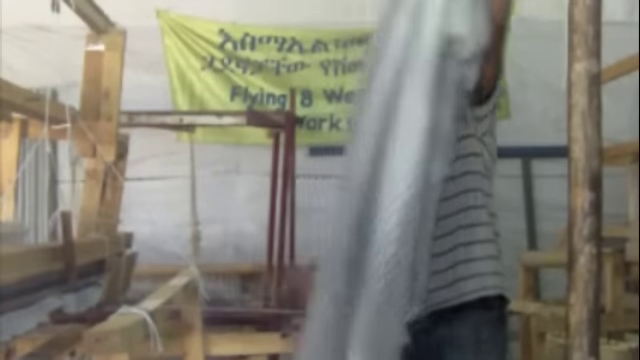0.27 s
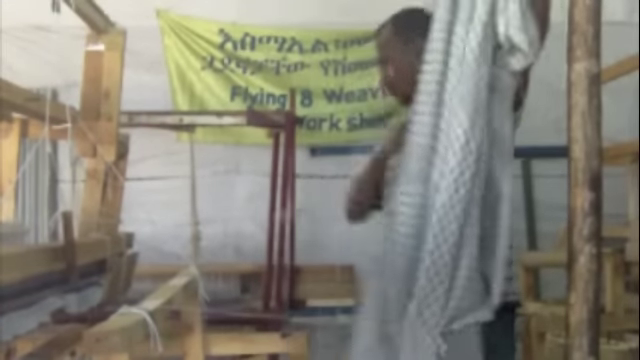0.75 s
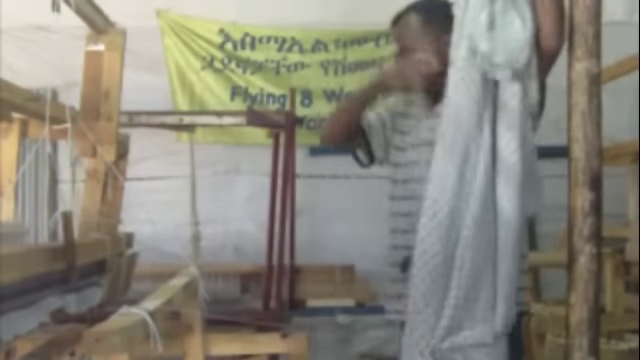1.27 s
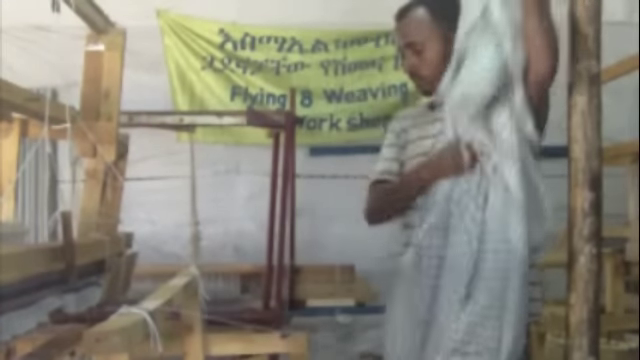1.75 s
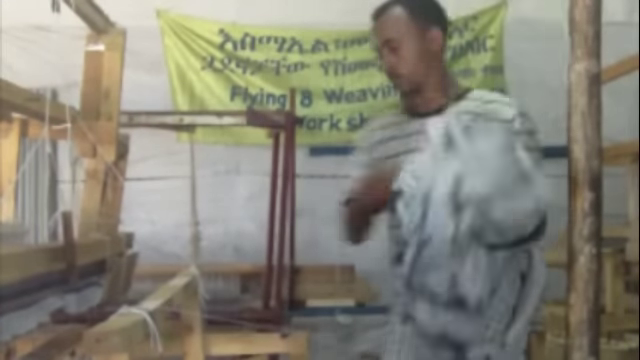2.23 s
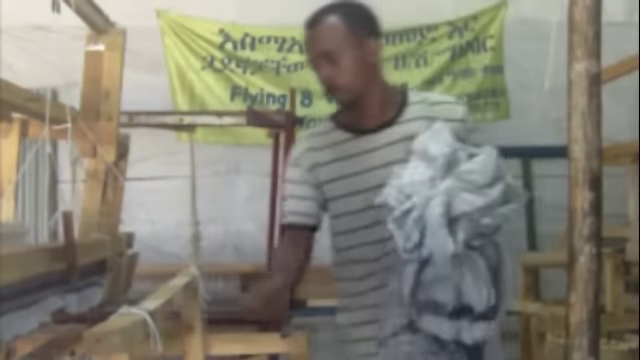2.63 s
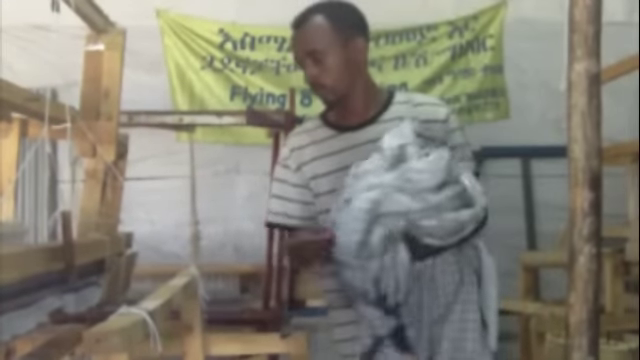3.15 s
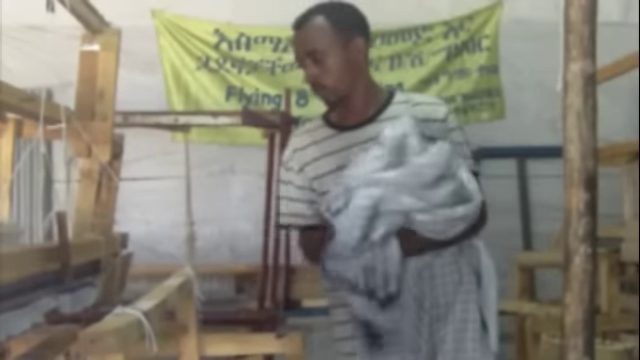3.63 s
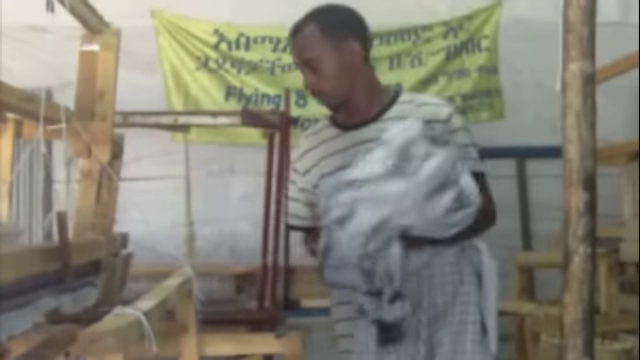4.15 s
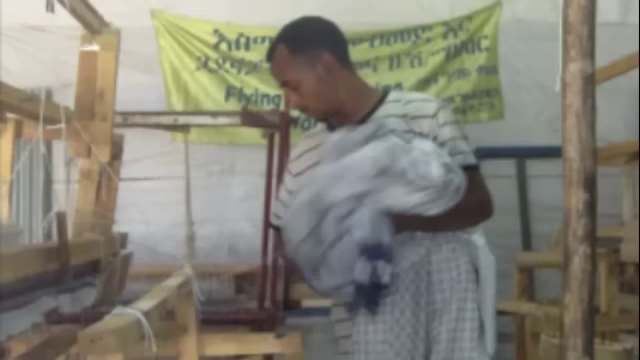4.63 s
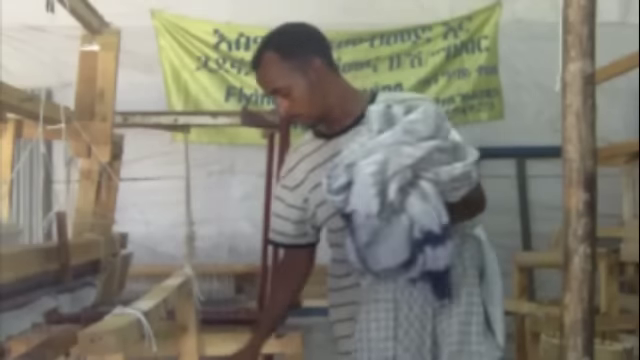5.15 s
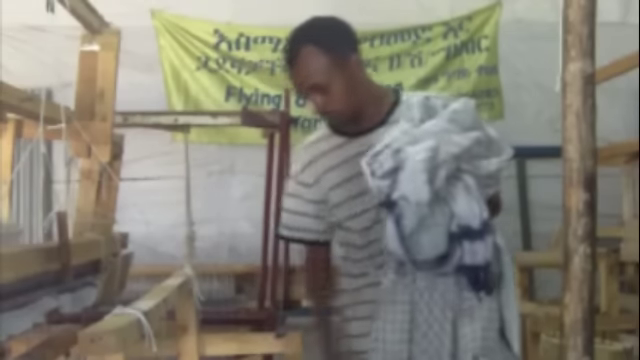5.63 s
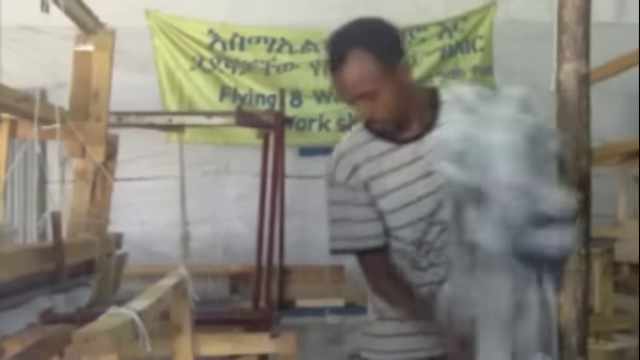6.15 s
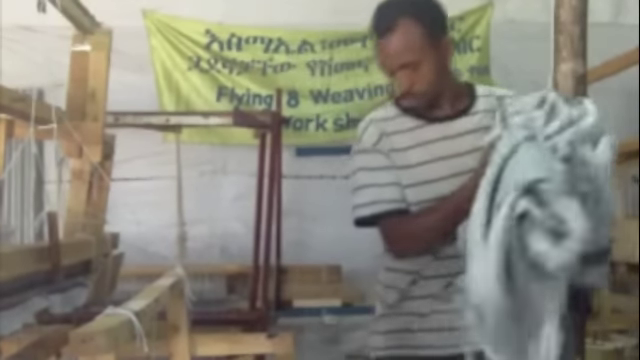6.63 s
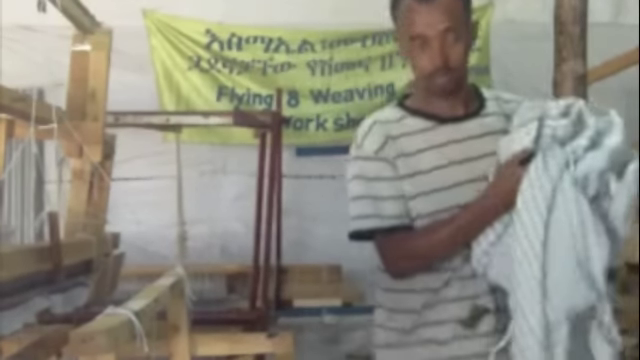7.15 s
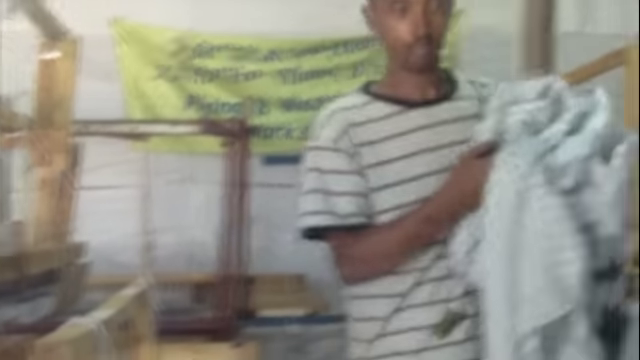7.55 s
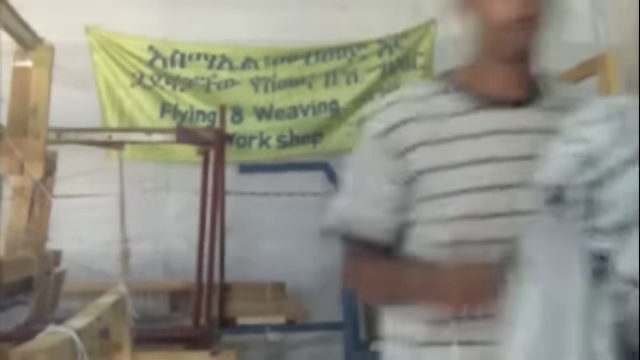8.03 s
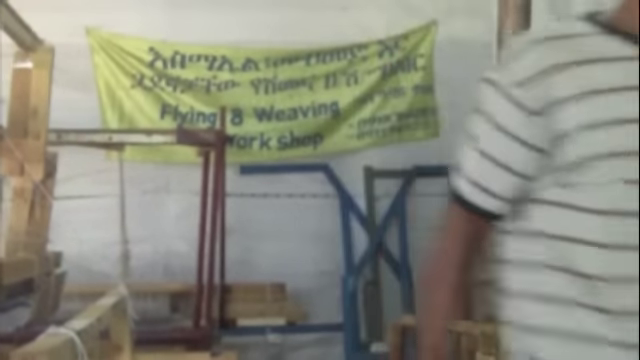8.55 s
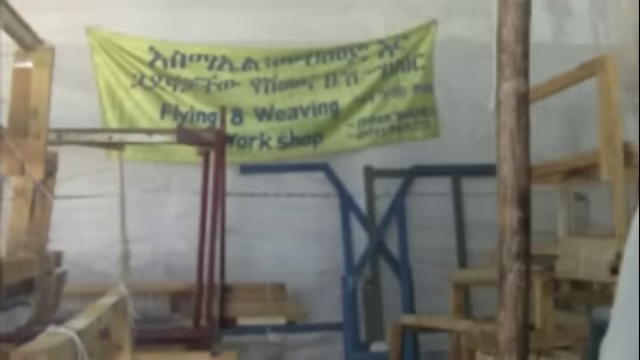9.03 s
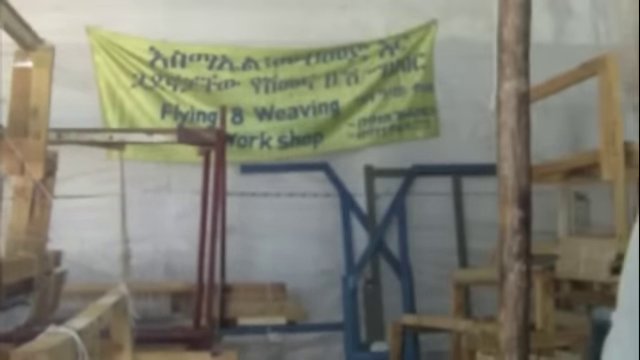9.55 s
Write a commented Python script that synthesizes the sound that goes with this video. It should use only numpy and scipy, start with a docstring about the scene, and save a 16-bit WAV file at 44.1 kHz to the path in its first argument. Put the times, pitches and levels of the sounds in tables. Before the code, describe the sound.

A handloom works steadily and close in a small workshop. About every 0.9 seconds a cord tugs, the shuttle rattles and rings along its wooden track with hard knocks and a rising squeak, judders into a hollow box, then the metal reed crashes and jingles. Dry clacks and treadle thuds fall between some passes. Sound is bright, light in bass, with short diffuse echoes and stereo treble leaning slightly right.

```python
"""A shuttle flies and rattles along its wooden track, rumbles into a box, and a metal reed crashes and jingles.
This is a handloom in a small workshop, worked steadily at about one pass ("pick") every 0.9 s, with clacks
and thuds as the treadles change over. Showers of tiny random impacts are the raw sound of each part: movements
and blows set their strength, and filters make wood, wire and box ring. Soft echoes and faint air lie behind.
"""
import sys
import numpy as np
from scipy import signal
from scipy.fft import rfft, irfft
from scipy.io import wavfile
from scipy.ndimage import uniform_filter1d

SR = 44100
rng = np.random.default_rng(int(sys.argv[2]) if len(sys.argv) > 2 else 0)


def bounce(signal):
    """Save signal as a 16-bit WAV file at the path given by the first command-line argument."""
    frames = np.transpose(np.atleast_2d(signal))
    limited = np.clip(frames, -1, 1)
    pcm = np.round(limited * 32767).astype(np.int16)
    wavfile.write(sys.argv[1], SR, pcm)


N = 431298

# In tables of blows, modes and spectra, levels are relative: each layer adds its own level later.
# the weaver's rhythm, one row a pick: cord_pulled_s, shuttle_thrown_s, shuttle_caught_s, reed_beats_s
PICKS = [(-.08, .057, .357, .475), (.82, .959, 1.243, 1.329), (1.78, 1.897, 2.187, 2.317),
         (2.675, 2.797, 3.093, 3.178), (3.63, 3.751, 4.038, 4.16), (4.53, 4.638, 4.932, 5.023),
         (5.45, 5.563, 5.842, 5.975), (6.33, 6.451, 6.752, 6.833), (7.27, 7.38, 7.666, 7.79),
         (8.13, 8.263, 8.566, 8.635), (9.075, 9.202, 9.492, 9.611)]
# how hard each pick is worked: throw_db, shuttle_ring_db, catch_db, beat_db, jingle_t60_s
EFFORT = [(-1, 0.5, 0.5, -0.5, 0.54), (-2, 3, 1, -0.5, 0.95), (-3, 0.5, 1, .5, 0.61),
          (-0.5, 0.5, -1, 0.5, 0.67), (4, -1, 0, 0, 1), (0.5, -0.5, 0.5, 0.5, 0.67), (0, 3.5, 0.5, 0, 1.0),
          (-0.5, -1, -1.5, 0, 0.76), (0.5, 1, 0.5, 0, 0.92), (-0.5, -1, -1, 0, 0.51),
          (-2, 1, -0.5, 0.5, .6)]
# hardest knocks of the shuttle on its track (the race): time_s, level_db
KNOCKS = [(.1446, -2.5), (0.9248, -1.5), (1.0232, -1), (1.144, -4.5), (1.9809, -1.5), (2.7418, -2.5),
          (2.8374, 0), (2.9745, -4), (3.836, -1.5), (4.5852, -1.5), (4.674, -2), (4.83, -3.5),
          (5.637, -7.5), (6.4108, -3), (6.4936, -2), (6.618, -4), (7.5677, -5), (8.2206, -2), (8.2945, -5),
          (9.2833, -1.5), (9.3492, -3)]
# hard dry clacks of the gear that parts the threads: time_s, level_db
CLACKS = [(1.6017, -0.5), (1.844, -7.5), (3.4477, -3), (3.474, -6.5), (3.693, -8.5), (5.272, -3.5),
          (7.1006, -1.5), (8.9114, -2), (9.1067, -9)]
# a treadle thuds down after every second pick: time_s, level_db
TREADLES = [(.677, -18), (2.531, -25.5), (4.358, -23), (6.183, -26), (7.985, -23.5)]
# the heddles (wires that lift the threads) are jolted as the shed changes: time_s, level_db
JOLTS = [(.6594, -21), (3.3044, -10), (3.544, -11.5), (3.6506, -9), (4.3444, -16), (5.2044, -8.5),
         (6.283, -9.5), (7.2995, -7), (8.078, -6), (8.162, -11)]

# Stages of a pick: 0 throw, 1 catch, 2 beat, 3 next throw.
# the shuttle's own ring sinks as it slows, then climbs back late in the pick: stage, pitch_hz (before wobble)
SHUTTLE_RING = [(0, 2410), (.4, 2374), (.75, 2190), (1.0, 2040), (2.0, 1950), (2.7, 2480)]
# the box's hollow ring rises as the shuttle slides in: stage, pitch_hz
BOX_RING = [(.8, 1130), (1.2, 1170), (1.6, 1520), (2.0, 1580)]
# the squeak along the warp climbs, then eases back: stage, pitch_hz (before wobble), strength_0_to_1
SQUEAK = [(.1, 3900, 0), (.35, 4550, 0.45), (.6, 4920, 0.73), (.85, 5280, 1), (1.05, 5050, 0.4)]

# resonances of the gear, race, wires and reed blades: pitch_hz, width_hz, level_db
CLACK_MODES = [(1360, 73, -20), (2750, 500, -3), (3116, 65, 1.5), (3530, 280, 1), (4200, 160, -7),
               (5500, 1500, -12)]
RACE_MODES = [(909, 86, -8), (2594, 195, 1), (3625, 160, -2.5), (4070, 190, 0), (4990, 260, -5),
              (6080, 300, -6)]
WIRE_MODES = [(682, 47, -11.5), (987, 55, -12.5), (1346, 31, -7.5), (1690, 20, 1.8), (1854, 50, -2),
              (2013, 21, 3), (2254, 64, -2), (2716, 28, 0), (3095, 30, -2.5), (3450, 41, -10),
              (3720, 87, -14), (5050, 91, -1.5), (5370, 67, -3)]
BLADE_MODES = [(4990, 420, 0), (5720, 400, -3.5), (6450, 450, 0), (8500, 900, -7.5)]

# tone colour of each body, and of the air: frequency_hz, level_db (per Hz)
RACE_COLOUR = [(120, -56), (300, -32.5), (450, -12), (700, -9), (1200, -5.5), (1750, -10), (2150, 4),
               (2650, -0.5), (3250, -0.5), (3900, 3), (6200, -3.5), (7300, -8.5), (8600, -7.5),
               (15000, -15.5)]
BOX_COLOUR = [(71, -72), (120, -51), (530, -10), (733, -8.5), (881, -3.5), (1320, -4.5), (1490, -3),
              (2340, -7.5), (2640, -2), (3240, -8), (4130, -6), (4480, -8.5), (14600, -19.5), (15500, -24)]
REED_COLOUR = [(120, -59), (280, -37.5), (370, -18), (600, -19.5), (900, -14.5), (1500, -9.5), (2000, -4),
               (3100, -3.5), (4200, -4.5), (5000, 0.5), (6500, -4), (7500, -6), (10000, -7.5),
               (15000, -12.5)]
FRAME_COLOUR = [(40, -42), (110, -38), (170, -24), (270, -22), (400, 0), (550, -0.5), (800, 0), (1600, -19),
                (5000, -40)]
FRAME_CRACK_COLOUR = [(300, -27), (700, 3), (950, 4), (1450, -0.5), (2200, -13), (6000, -26), (15000, -36)]
AIR_COLOUR = [(15, -54), (25, -24), (54, -33), (86, -29), (246, -4), (300, 4), (390, -31), (660, -120)]
# treble, then low echoes, that differ between the ears: frequency_hz, level_db (per Hz)
TREBLE_WIDTH = [(300, -59), (2000, -34), (3400, -58), (4700, 1.5), (6200, 5), (8000, 2.5), (15000, 0)]
LOW_WIDTH = [(150, -6), (300, -11), (430, -7), (600, -5), (740, -3), (1000, -20), (2000, -60)]
# the treble leans to the right: frequency_hz, left_minus_right_db
LEAN = [(3500, 0), (6000, -.7), (9000, -3.2), (15000, -3.4)]

AIR_DB, CUTOFF_HZ = -72, 15450
# build-up of the cord pull; slide before the shuttle leaves or reaches a box; beater's swing before it strikes
PULL_S, SLIDE_S, SWING_S = 0.1, 0.027, 0.054
SHAKE_S = 0.31  # the heddles keep shaking this long after the catch


def weaving():
    """Each pick chains pull, flight, catch and beat; each shakes its own part and a little of the others."""
    pull, throw, catch, beat = np.transpose(PICKS)
    throw_db, sing_db, catch_db, beat_db, jingle_t60 = np.transpose(EFFORT)
    t = np.arange(N) / SR
    marks = np.column_stack([throw, catch, beat]).ravel()
    stage = np.interp(t, marks, np.arange(len(marks))) % 3

    pulling = stroke(pull, catch, db=-19.5, attack_s=PULL_S, sag_db_per_s=15, t60=0.4)
    flight = stroke(throw - SLIDE_S, catch, throw_db - 21.5, attack_s=0.021, sag_db_per_s=1.5, t60=0.35)
    leaving = stroke(throw - SLIDE_S, throw, throw_db - 23.5, attack_s=0.02, sag_db_per_s=5, t60=0.38)
    landing = stroke(catch - SLIDE_S, beat, catch_db - 18.0, attack_s=0.028, sag_db_per_s=23, t60=0.055)
    shake_end = catch + SHAKE_S
    beating = stroke(beat - SWING_S, shake_end, beat_db - 17, attack_s=0.041, sag_db_per_s=7, t60=jingle_t60)
    # a negative sag: the lasting tones grow a little first
    ringing = stroke(beat - SWING_S, shake_end, beat_db - 26, attack_s=0.064, sag_db_per_s=-2, t60=1.0)
    # the loom never comes wholly to rest between picks
    idle = from_db(-37.5)

    race = together(flight, pulling, from_db(-20) * beating, idle)
    box = together(leaving, landing, from_db(-5) * pulling, from_db(-19) * ringing, idle)
    wires = together(beating, from_db(-6.5) * pulling)
    tones = together(ringing, from_db(-15.5) * pulling)
    shuttle_ring_db = np.interp(t, throw, sing_db) - 4

    loom = shuttle(stage, race, body_db=-4.5, race_db=-8.0, ring_db=shuttle_ring_db,
                   knock_db=-10.5, knock_ring_db=-11.5)
    loom += shuttle_box(stage, box, level_db=-0.05, ring_db=-13.5)
    loom += squeak(stage, race, level_db=-7.5)
    loom += reed(wires, tones, hiss_db=-1.5, blade_db=-9, ring_db=-1, beat_db=-10.0, jolt_db=-7.5, tick_db=-13)
    loom += from_db(-11) * heddle_pings(together(beating, pulling), low_hz=3590, high_hz=8510,
                                        t60=0.078, spread_db=17, count=1200)
    loom += frame(throw, throw_db, thud_db=-25, crack_db=-19.5, impact=3.6)
    loom += frame(catch, catch_db, thud_db=-27, crack_db=-25.5, impact=5.6)
    loom += frame(*np.transpose(TREADLES), thud_db=-3.5, crack_db=-5, impact=5)
    loom += shedding_gear(tick_db=9, buzz_db=-9, rebound_s=0.0061, rebound=0.55)
    return loom


def shuttle(stage, strength, body_db, race_db, ring_db, knock_db, knock_ring_db):
    """The shuttle bounces along the race; both of them ring, too small to radiate bass."""
    run = strength * clatter(per_s=45, t60=0.044, steady=0.36)
    hits = blows(*np.transpose(KNOCKS))
    chatter = swelling(hits, t60=0.052, rise_s=0.0022) * contacts(per_s=8000, spread_db=1.0)
    knocks = 2.6 * hits + chatter
    rumble = from_db(body_db) * run * contacts(per_s=10000, spread_db=2.5)
    body = colour(rumble + from_db(knock_db) * knocks, RACE_COLOUR)
    race = from_db(race_db) * rattling(strength, RACE_MODES, per_s=35, t60=0.064)

    # the ring is strong in flight and weaker after the catch
    flying = np.interp(stage, [0, 0.15, 1, 1.3, 2.8, 3], [0.9, 0.88, 0.84, 0.3, 0.2, 0.61])
    flying = flying * clatter(per_s=45, t60=0.056, steady=0.28)
    drive = from_db(ring_db) * strength * flying * contacts(per_s=4000, spread_db=0.5)
    drive += from_db(knock_ring_db) * knocks
    ring_hz = np.interp(stage, *np.transpose(SHUTTLE_RING)) * (1 + 0.045 * drift(31))
    return body + high_pass(race + glide(drive, ring_hz, width_hz=155), hz=720)


def shuttle_box(stage, strength, level_db, ring_db):
    """The caught shuttle judders to rest in its hollow wooden box."""
    force = strength * clatter(per_s=70, t60=0.043, steady=0.52) * contacts(per_s=5000, spread_db=1.5)
    inside = np.interp(stage, [0.7, 0.9, 1.9, 2.1], [0, 1, 1, 0])
    ring = glide(force * inside, np.interp(stage, *np.transpose(BOX_RING)), width_hz=85)
    return from_db(level_db) * colour(force, BOX_COLOUR) + from_db(ring_db) * high_pass(ring, hz=706)


def squeak(stage, strength, level_db):
    """Stick and slip excite one narrow resonance that mostly rises."""
    at, hz, share = np.transpose(SQUEAK)
    drive = strength * np.interp(stage, at, share)
    drive = drive * clatter(per_s=25, t60=0.16, steady=0.15) * contacts(per_s=3000, spread_db=-0.5)
    ring = glide(drive, np.interp(stage, at, hz) * (1 + 0.03 * drift(4)), width_hz=140)
    return from_db(level_db) * high_pass(ring, hz=2000)


def reed(strength, ringing, hiss_db, blade_db, ring_db, beat_db, jolt_db, tick_db):
    """The beat sets reed and heddle wires jingling densely, with a few lasting tones and fine ticks."""
    _, _, _, beat = np.transpose(PICKS)
    _, _, _, force_db, _ = np.transpose(EFFORT)
    crash = swelling(blows(beat, force_db + beat_db), t60=0.15, rise_s=0.014)
    crash += from_db(jolt_db) * swelling(blows(*np.transpose(JOLTS)), t60=0.17, rise_s=0.0017)
    hiss = from_db(hiss_db) * strength * clatter(per_s=60, t60=0.12, steady=0.91)
    force = np.hypot(hiss, crash)
    jingle = colour(force * contacts(per_s=12000, spread_db=1.0), REED_COLOUR)
    blades = from_db(blade_db) * rattling(force, BLADE_MODES, per_s=25, t60=0.1)

    touches = ringing * clatter(per_s=18, t60=0.34, steady=0.18) * contacts(per_s=900, spread_db=2.5)
    tones = from_db(ring_db) * resonate(touches, WIRE_MODES)
    ticks = strength * clatter(per_s=16, t60=0.072, steady=0.091) * contacts(per_s=3000, spread_db=-2.0)
    return jingle + high_pass(blades + tones, hz=580) + from_db(tick_db) * high_pass(ticks, hz=8500)


def heddle_pings(strength, low_hz, high_hz, t60, spread_db, count):
    """Loose heddle wires touch one another, each ringing briefly at a pitch of its own."""
    t = np.arange(SR // 12) / SR
    out = np.zeros(N + SR)
    for when, pitch, size in rng.random((count, 3)):
        at = int(when * N)
        hz = low_hz * (high_hz / low_hz) ** pitch
        out[at:at + len(t)] += np.sin(2 * np.pi * hz * t) * from_db(spread_db * size - 60 * t / t60)
    return strength * rms_one(out[:N])


def frame(times, db, thud_db, crack_db, impact):
    """Heavy blows give a low thud and a woody crack: one impact, then the joints chatter."""
    low, high = blows(times, db + thud_db), blows(times, db + crack_db)
    low_chatter = dying(low, t60=0.096) * contacts(per_s=3000, spread_db=2.0)
    high_chatter = dying(high, t60=0.097) * contacts(per_s=3000, spread_db=2.0)
    thud = colour(impact * low + low_chatter, FRAME_COLOUR)
    crack = colour(impact * high + high_chatter, FRAME_CRACK_COLOUR)
    return thud + crack


def shedding_gear(tick_db, buzz_db, rebound_s, rebound):
    """Each clack is a sharp tick and a buzz of contact, which one rebound renews."""
    times, db = np.transpose(CLACKS)
    first = blows(times, db)
    both = first + rebound * blows(times + rebound_s, db)
    buzz = dying(both, t60=0.08) * contacts(per_s=4300, spread_db=1.5)
    clacks = resonate(from_db(tick_db) * first + from_db(buzz_db) * buzz, CLACK_MODES)
    return high_pass(clacks, hz=870)


def reflections(x, t60, gap_s):
    """Diffuse echoes from the walls: fading noise after a short gap, with the power of the input."""
    t = np.arange(SR // 2) / SR
    h = rng.standard_normal(len(t)) * from_db(-60 * t / t60) * (t > gap_s)
    return signal.oaconvolve(x, h / np.linalg.norm(h))[:N]


def room_air():
    """The faint low noise of the air is coloured random noise."""
    return from_db(AIR_DB) * colour(rng.standard_normal(N), AIR_COLOUR)


def stroke(start, end, db, attack_s, sag_db_per_s, t60):
    """The same movement in every pick: it builds up, sags while it lasts and dies away after its end."""
    t = np.arange(0, N, 50)[:, None] / SR  # one column per pick, every 50th sample
    rise = np.clip((t - start) / attack_s, 0, 1)
    sag_db = sag_db_per_s * np.clip(t - start, 0, end - start)
    fall_db = sag_db + 60 * np.maximum(t - end, 0) / t60
    strength = np.linalg.norm(rise * from_db(db - fall_db), axis=1)
    return np.interp(np.arange(N) / SR, t[:, 0], strength)


def together(*strengths):
    """Unrelated vibrations add in power."""
    return np.sqrt(sum(s ** 2 for s in strengths))


def blows(times, db):
    """One single-sample kick for each blow."""
    kicks = np.zeros(N)
    kicks[np.clip((times * SR).astype(int), 0, N - 1)] = from_db(db)
    return kicks


def dying(kicks, t60):
    """Each kick starts an exponential decay, 60 dB down after t60 seconds."""
    return signal.lfilter([1], [1, -from_db(-60 / (t60 * SR))], kicks + 1e-18)


def swelling(kicks, t60, rise_s):
    """A burst of chatter takes a moment to build up, then dies."""
    return uniform_filter1d(dying(kicks, t60), max(1, int(rise_s * SR)))


def clatter(per_s, t60, steady):
    """Strength of a loose part that bounces at uneven intervals over a steady rub; rms 1."""
    at = (np.cumsum(rng.uniform(0.3, 1.7, 4000)) / per_s * SR).astype(int)
    size, kicks = rng.random(len(at)), np.zeros(N)
    kicks[at[at < N]] = size[at < N]
    return rms_one(steady + dying(kicks, t60))


def contacts(per_s, spread_db):
    """Tiny random impacts of uneven size; rms 1."""
    happens = rng.random(N) < per_s / SR
    sign = rng.choice([-1, 1], N)
    size = from_db(spread_db * np.minimum(rng.exponential(1, N), 4))
    return rms_one(happens * sign * size)


def rattling(strength, modes, per_s, t60):
    """Each bounce lands on another spot and so favours another mode: every mode has its own clatter."""
    out = np.zeros(N)
    for hz, width, db in modes:
        force = strength * clatter(per_s, t60, steady=0.11) * contacts(per_s=4000, spread_db=1.95)
        out += from_db(db) * resonate(force, [(hz, width, 0)])
    return out


def resonate(x, modes):
    """Resonances side by side, keeping the power of white input."""
    t = np.arange(SR // 8) / SR
    h = np.zeros(len(t))
    for k, (hz, width, db) in enumerate(modes):
        decay = from_db(db) * np.sqrt(width) * np.exp(-np.pi * width * t)
        h += (-1) ** k * decay * np.sin(2 * np.pi * hz * t)
    return signal.oaconvolve(x, h / np.linalg.norm(h))[:N]


def glide(x, hz, width_hz):
    """One resonance with a moving centre, keeping the power of white input."""
    turn = np.exp(2j * np.pi * np.cumsum(hz) / SR)
    r = np.exp(-np.pi * width_hz / SR)
    # shift the centre down to 0 Hz, smooth, and shift back up
    smooth = signal.lfilter([1], [1, -r], x * turn.conj())
    return np.sqrt(2 * (1 - r * r)) * np.real(turn * smooth)


def response(spectrum, size=2048):
    """Causal (minimum-phase) impulse response with the given spectrum."""
    hz, db = np.transpose(spectrum)
    grid = np.maximum(np.fft.rfftfreq(size, 1 / SR), 1)
    gain = from_db(np.interp(np.log(grid), np.log(hz), db))
    cepstrum = irfft(np.log(gain))
    # fold the later half onto the earlier, so that nothing sounds ahead of time
    cepstrum[1:size // 2] *= 2
    cepstrum[size // 2 + 1:] = 0
    return irfft(np.exp(rfft(cepstrum)))


def colour(x, spectrum):
    """Pass through a body with this spectrum, keeping the power of white input."""
    h = response(spectrum)
    return signal.oaconvolve(x, h / np.linalg.norm(h))[:N]


def high_pass(x, hz):
    """Steep low cut."""
    return signal.sosfilt(signal.butter(4, hz, "high", fs=SR, output="sos"), x)


def drift(rate):
    """Smooth random wander with spread 1, made at a twentieth of the sample rate."""
    r = np.exp(-40 * np.pi * rate / SR)
    noise = rng.standard_normal(N // 20 + 2002)
    slow = signal.lfilter([1], [1, -2 * r, r * r], noise)[2000:]  # skip the filter's start-up
    return np.interp(np.arange(N) / 20, np.arange(len(slow)), rms_one(slow))


def rms_one(x):
    """Scale to unit rms."""
    return x / np.sqrt(np.mean(x ** 2) + 1e-20)


def from_db(db):
    """Decibels to gain."""
    return 10 ** (np.asarray(db) / 20)


def scene():
    """The loom stands close by in a small workshop."""
    # the loom is heard with little bass
    loom = signal.sosfilt(signal.butter(3, 150, "high", fs=SR, output="sos"), weaving())
    mid = loom + from_db(-11.5) * reflections(loom, t60=0.32, gap_s=0.006) + room_air()
    # the treble scatters differently to each ear: random sign flips make noise that follows its level
    scattered = high_pass(mid, hz=5040) * rng.choice([-1, 1], N)
    side = from_db(-7.5) * high_pass(colour(scattered, TREBLE_WIDTH), hz=3030)
    # low room echoes reach the ears differently too
    side += from_db(-36) * colour(reflections(loom, t60=0.13, gap_s=0.0035), LOW_WIDTH)
    left = signal.oaconvolve(mid + side, response(LEAN))[:N]
    return np.array([left, mid - side])


def record(dry):
    """The microphone has a narrow notch in the treble; only the highest peaks are rounded, and the top is cut."""
    notched = signal.lfilter(*signal.iirnotch(7900, 45, fs=SR), dry)
    rounded = notched / (1 + (notched / 0.97) ** 16) ** (1 / 16)
    return signal.sosfilt(signal.ellip(10, 0.1, 80, CUTOFF_HZ, fs=SR, output="sos"), rounded)


dry = scene()
out = record(dry)
bounce(out)
```